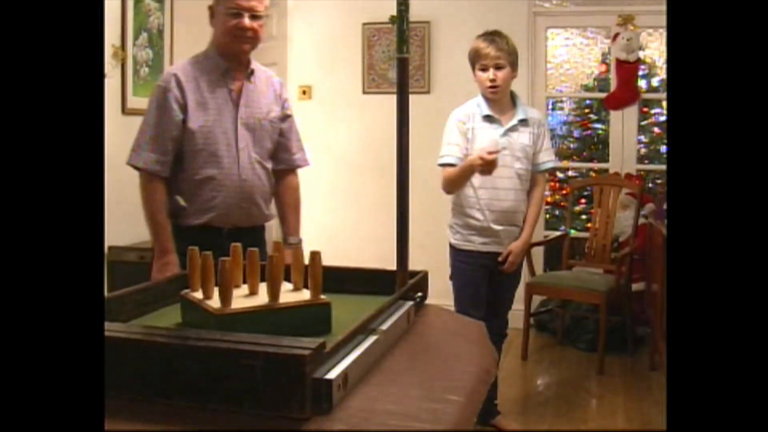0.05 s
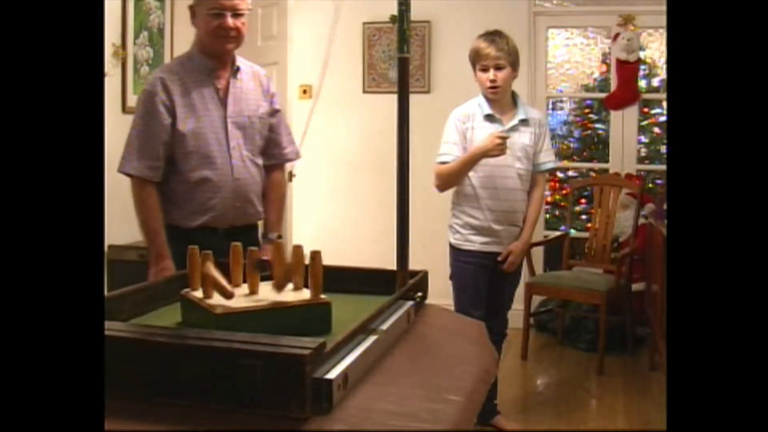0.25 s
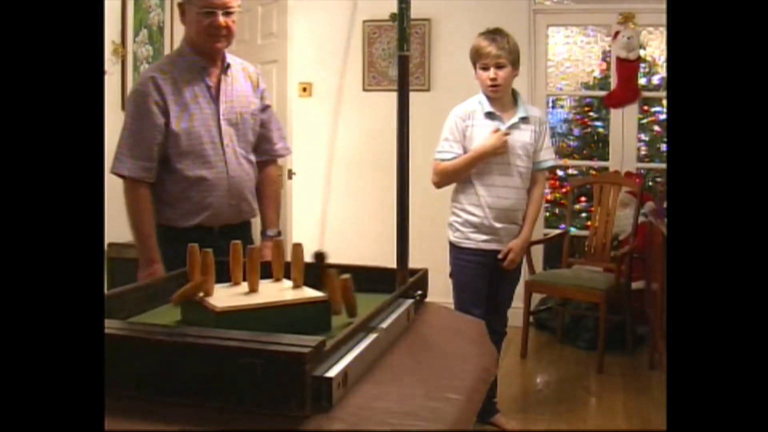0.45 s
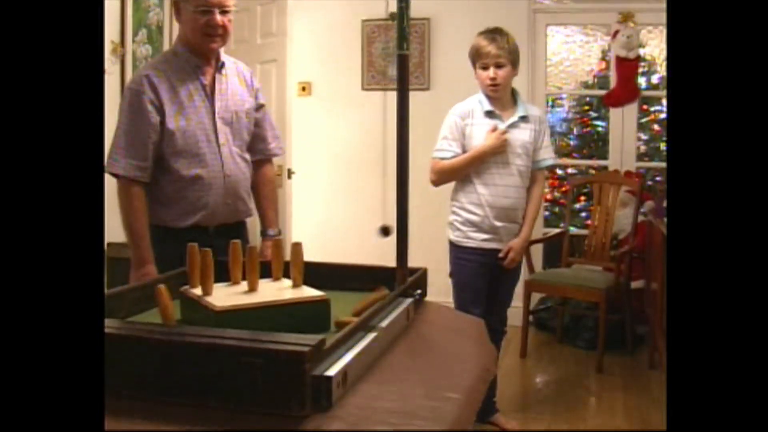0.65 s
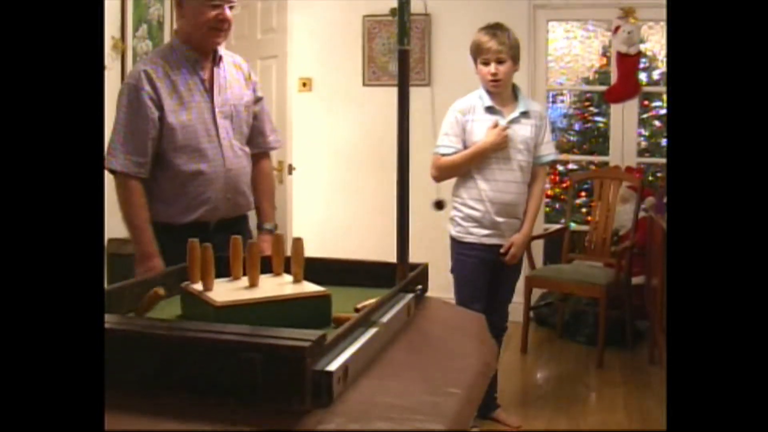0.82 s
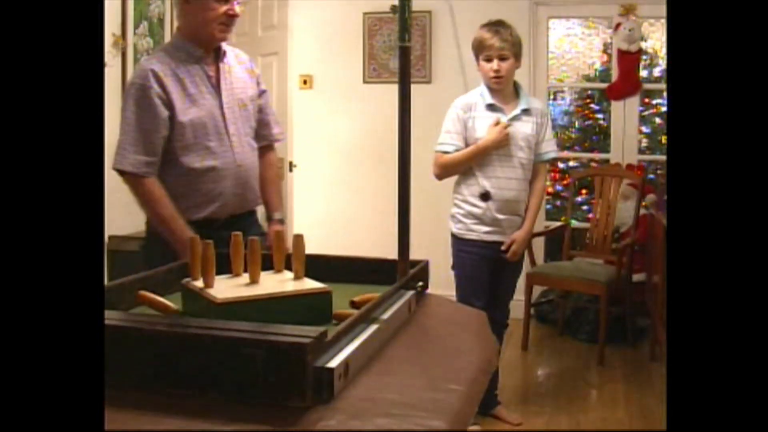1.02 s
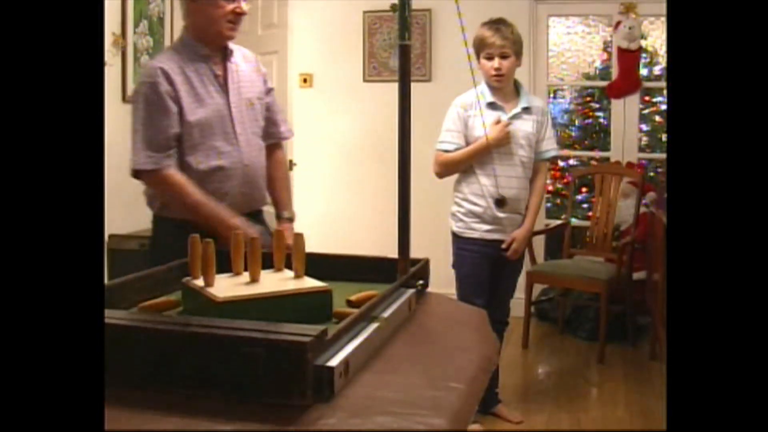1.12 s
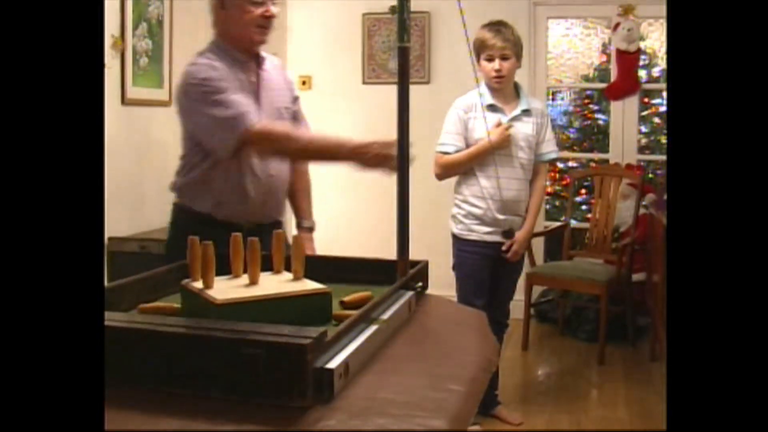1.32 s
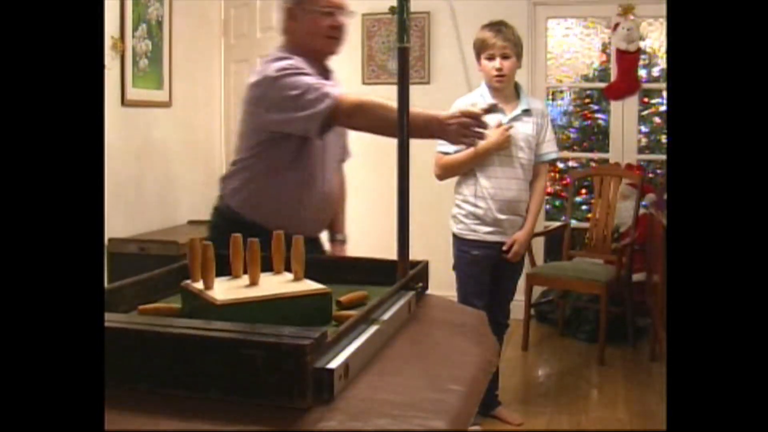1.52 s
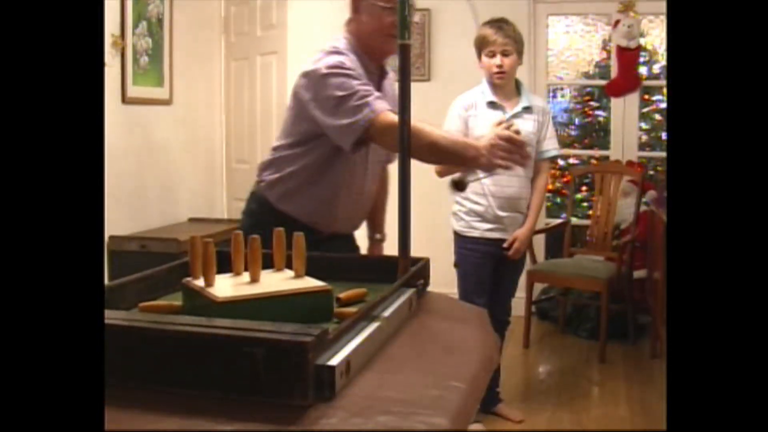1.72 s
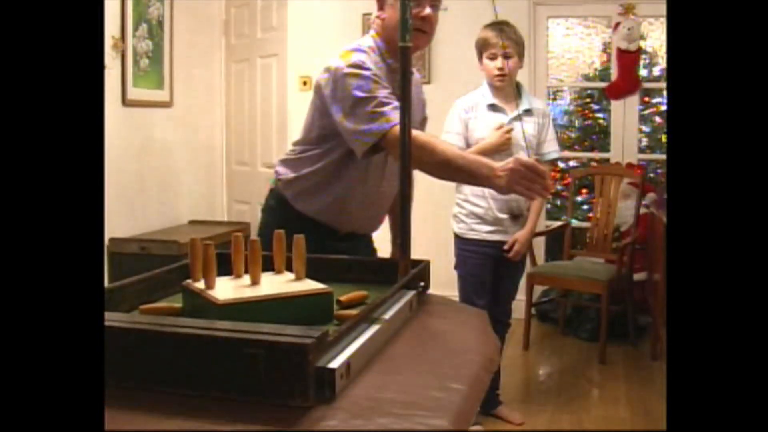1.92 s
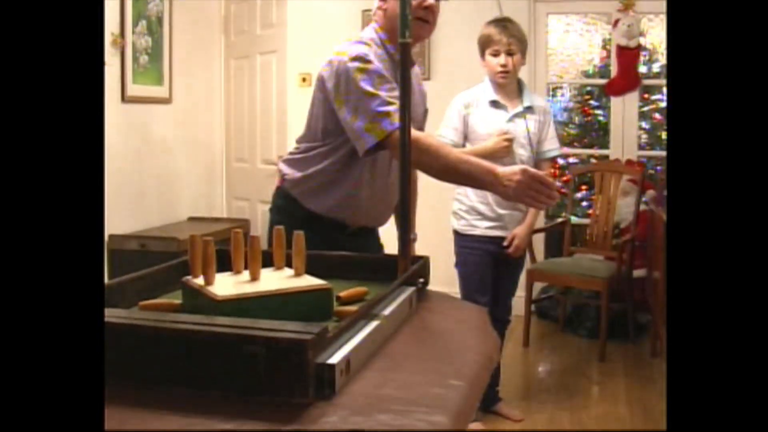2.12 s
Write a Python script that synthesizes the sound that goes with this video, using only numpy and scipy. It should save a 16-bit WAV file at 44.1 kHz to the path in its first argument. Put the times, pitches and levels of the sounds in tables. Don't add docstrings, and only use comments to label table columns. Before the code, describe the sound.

Hardwood cracks come first, then loud hollow knocks and rattling as skittles tumble into a wooden tray, quickly fading to soft rustling, cord creaks and light bumps, in a small live room on a modest microphone.

```python
import sys
import numpy as np
from scipy import signal
from scipy.fft import rfft, irfft
from scipy.io import wavfile

SR = 44100
rng = np.random.default_rng(int(sys.argv[2]) if len(sys.argv) > 2 else 0)


def dump(signal):
    limited = np.clip(np.atleast_2d(signal).T, -1, 1)
    pcm = np.round(limited * 32767).astype(np.int16)
    wavfile.write(sys.argv[1], SR, pcm)


def amplitude_ratio(level_db):
    exponent = np.asarray(level_db, float) / 20
    return 10 ** exponent


N = 95388
TIME_S = np.arange(N) / SR
LUCK_DB = 3

# pitch_hz [Hz], level_db [dB], t60_s [s to fall 60 dB]
TRAY_MODES = [(235, -9, 0.056), (278.8, -4.5, 0.065), (331, -4.5, 0.029), (355.2, 0.5, 0.056),
              (408, -2.5, 0.035), (429.6, -2.5, 0.048), (478, -2, 0.035), (546.5, -3, 0.044),
              (683, -4.5, 0.046), (778, -4, 0.026), (812, -5.5, 0.039), (1023, -7, 0.028),
              (1290, -12, 0.053), (1477, -18, 0.017)]


def rms_one(x):
    return x / np.sqrt(np.mean(x ** 2) + 1e-20)


def curve(rows):
    start_s, level_db = np.transpose(rows)
    return np.interp(TIME_S, start_s, level_db)


def at_hz(points, hz):
    points = np.array(points)
    return np.interp(np.log(hz), np.log(points[:, 0]), points[:, 1])


def colour(x, spectrum):
    size = 4096
    hz = np.arange(size // 2 + 1) * SR / size + 1
    cepstrum = irfft(at_hz(spectrum, hz) * np.log(10) / 20)
    cepstrum[1:size // 2] *= 2
    cepstrum[size // 2 + 1:] = 0
    response = irfft(np.exp(rfft(cepstrum)))[:size // 2]
    return signal.fftconvolve(x, response)[:len(x)]


def ring(clicks, hz, t60_s):
    decay = amplitude_ratio(-60 / (t60_s * SR))
    turn = 2 * np.pi * hz / SR
    return signal.lfilter([0, np.sin(turn)], [1, -2 * decay * np.cos(turn), decay ** 2], clicks + 1e-18)


def blows(rows, modes, spread_db):
    luck = rng.standard_normal((len(rows), len(modes)))
    out = np.zeros(N)
    for k, (hz, mode_db, t60_s) in enumerate(modes):
        clicks = np.zeros(N)
        for (start_s, peak_db, tilt_db, *spot_hz), z in zip(rows, luck):
            off_db = 0
            if spot_hz:
                off_db = min(15.5 * abs(np.log2(hz / spot_hz[0])), 10)
            bright_db = np.clip(tilt_db, -8, 4) * np.log2(hz / 400)
            clicks[int(start_s * SR)] += amplitude_ratio(peak_db + mode_db - off_db + spread_db * z[k] + bright_db)
        out += ring(clicks, hz, t60_s) * (-1) ** k
    return out


def plain_blows(rows, modes, spread_db):
    return blows([(start_s, peak_db, 0) for start_s, peak_db in rows], modes, spread_db)


def grains(per_s):
    sizes = amplitude_ratio(1.5 * np.minimum(rng.exponential(1, N), 4)) * rng.choice([-1, 1], N)
    return sizes * (rng.random(N) < per_s / SR)


def room(x):
    # pitch_hz [Hz], t60_s [s]
    decay_times = [(100, 1), (300, 0.45), (1000, 0.65), (3000, 0.55), (6000, 0.4), (12000, 0.2)]
    spots, spot_s, first_echo_s = 4, 0.05, 0.0037
    t = np.arange(SR) / SR
    edges_hz = 60 * 2 ** np.arange(0, 8, 0.5)
    white = rng.standard_normal((2, spots, SR))
    tail = 0
    for k, (low, high) in enumerate(zip(edges_hz, edges_hz[1:])):
        band_filter = signal.butter(2, [low, high], "band", fs=SR, output="sos")
        band = signal.sosfilt(band_filter, white[k % 2])
        tail = tail + band * amplitude_ratio(-60 * t / at_hz(decay_times, np.sqrt(low * high)))
    tail = tail * np.clip(t / first_echo_s - 0.5, 0, 1)
    tail = tail / np.sqrt(np.sum(tail ** 2, axis=1, keepdims=True))
    place = (TIME_S / spot_s - np.arange(spots)[:, None]) % spots
    share = np.sqrt(np.clip(1 - np.abs(place - 1), 0, 1))
    return signal.fftconvolve(x * share, tail, axes=1)[:, :N].sum(axis=0)


def air():
    # pitch_hz [Hz], level_db [dB per Hz]
    air_tone = [(60, -26), (110, -1), (350, 0), (600, -4.5), (1350, -10.5), (3000, -21), (7000, -12),
                (13000, -15.5)]
    return amplitude_ratio(-64) * rms_one(colour(rng.standard_normal(N), air_tone))


def cloth():
    # start_s [s], level_db [dB]
    movement = [(0, -62), (.3, -46.5), (.8, -59), (1.03, -69), (1.1, -63), (1.32, -59.5), (1.4, -54.5),
                (1.48, -54), (1.55, -64.5), (1.61, -56.5), (1.71, -61), (1.74, -69), (1.81, -72),
                (1.84, -55), (1.94, -56.5), (2.0, -64), (2.1, -66), (2.16, -63)]
    # pitch_hz [Hz], level_db [dB per Hz]
    cloth_tone = [(150, -15.5), (400, 4.5), (800, 2), (1300, -6.5), (2200, 1.5), (4000, -5.5), (7000, -5.5),
                  (13000, -10.5)]
    rub = rms_one(grains(per_s=2500)) + 0.5 * rng.standard_normal(N)
    return amplitude_ratio(curve(movement) - 1) * rms_one(colour(rub, cloth_tone))


def creak():
    # start_s [s], level_db [dB]
    strain = [
        (1.05, -76),
        (1.138, -61.5),
        (1.494, -61),
        (1.55, -72),
        (1.568, -63.5),
        (1.64, -59.5),
        (1.772, -76),
        (1.834, -60),
        (2.16, -69.5),
    ]
    # pitch_hz [Hz], level_db [dB], t60_s [s]
    cord_modes = [(1058, 3.5, 0.03), (1316, -0.5, 0.043), (1403, 1.5, 0.028), (1604, -3.5, 0.049)]
    slips = sum(amplitude_ratio(db) * ring(grains(per_s=450), hz, t60_s) for hz, db, t60_s in cord_modes)
    fade_in = np.clip((TIME_S - strain[0][0]) * 10 + 1, 0, 1)
    return amplitude_ratio(curve(strain) - 3) * fade_in * rms_one(slips)


def bumps():
    bump_times = [(1.324, -39, 4, 440), (1.334, -44.5, 6, 700), (1.347, -41, 6, 390),
                  (1.398, -43.5, 1, 453), (1.448, -51, 0, 536), (1.605, -50, 3, 347), (1.652, -44, 4, 372),
                  (1.821, -39.5, -0.5, 500), (1.837, -45.5, 5.5, 560), (1.852, -51, 3, 604),
                  (1.922, -55, 3, 480), (2.035, -47, -4, 245), (2.085, -46.5, 3, 510),
                  (2.105, -48.5, -4, 250)]
    return amplitude_ratio(-6.5) * blows(bump_times, TRAY_MODES, LUCK_DB)


def rolling():
    # start_s [s], level_db [dB]
    motion = [
        (0.29, -27),
        (0.358, -28),
        (0.406, -37),
        (0.462, -43),
        (0.556, -28),
        (0.7, -49),
        (1.05, -70.5),
        (1.2, -68),
    ]
    knocks = 0
    for hz, db, t60_s in TRAY_MODES:
        knocks = knocks + amplitude_ratio(db) * ring(grains(per_s=130), hz, t60_s) / (1 + (hz / 900) ** 2)
    fade_in = np.clip((TIME_S - motion[0][0]) * 100, 0, 1)
    fade_out = np.clip((motion[-1][0] - TIME_S) * 10 + 1, 0, 1)
    return amplitude_ratio(curve(motion) - 2.5) * fade_in * fade_out * rms_one(knocks)


def rocking():
    rock_times = [
        (0.047, -33.5),
        (0.056, -34),
        (.067, -31.5),
        (0.080, -36),
        (.093, -34.5),
        (0.133, -29),
        (0.158, -25.5),
        (0.174, -28.5),
        (.187, -28),
        (0.200, -28),
    ]
    # pitch_hz [Hz], level_db [dB], t60_s [s]
    plinth_modes = [(158.2, -8.5, 0.22), (235, -9.5, 0.085), (355, -1, 0.12), (511, -4, 0.099),
                    (668, -4.5, 0.05), (1060, -2.5, 0.061)]
    return amplitude_ratio(-2.5) * plain_blows(rock_times, plinth_modes, LUCK_DB)


def thuds():
    landings = [(0.2753, -1.5, 1.5, 372), (.281, -5, 3.5, 600), (.287, -2.5, -16.5, 354),
                (.296, -9.5, 3, 420), (.303, -10, -16, 310), (.318, -7.5, 4, 460), (.331, -20, 9, 404),
                (0.342, -13.5, -12, 460), (0.361, -10.5, -6, 453), (.373, -14.5, 2, 500),
                (.3875, -6, -1, 570), (0.3966, -3.5, 0.5, 355), (.403, -10.5, -9, 343),
                (.408, -8.5, 9, 900), (0.4138, -9.5, 4, 1000), (.421, -8, -12, 453),
                (.427, -7.5, -8.5, 403), (.449, -15.5, 5, 500), (.464, -20.5, 2.5, 686),
                (0.482, -20.5, 6, 450), (0.502, -14, 2.5, 390), (0.513, -23, 3, 397.4),
                (.531, -13.5, 2.5, 500), (.544, -15, -12, 426), (.557, -16, 8, 410.3), (.570, -18, -6, 420),
                (.584, -18, 4, 415), (.597, -17, 4, 354), (.612, -18, -2, 480), (.630, -25.5, 8, 557),
                (.652, -23, -1.5, 450), (.668, -23, 3, 437), (.690, -31, 4, 340), (.712, -23, -1, 353),
                (.733, -27.5, -3, 399.8), (0.757, -37, 0, 349)]
    # pitch_hz [Hz], level_db [dB], t60_s [s]
    frame_modes = [(134.3, -29, 1.2), (157.6, -21, 1.2), (169.6, -22.5, 1.28), (206, -24, 0.2)]
    frame = plain_blows([row[:2] for row in landings], frame_modes, LUCK_DB)
    return amplitude_ratio(-4) * blows(landings, TRAY_MODES, LUCK_DB) + amplitude_ratio(-19) * frame


def chatter():
    knocks = [(0.5299, -20.5), (0.5385, -18), (0.544, -17), (0.548, -22), (0.556, -24.5), (.578, -28),
              (0.627, -31), (0.6433, -28.5), (.672, -33.5), (0.699, -34), (0.789, -42.5)]
    # pitch_hz [Hz], level_db [dB], t60_s [s]
    ring_modes = [(1255, 2.5, 0.033), (1180, -14, 0.0076), (1270, -14, 0.0084)]
    ring_hz = ring_modes[0][0]
    in_step = [(np.round(start_s * ring_hz) / ring_hz, peak_db) for start_s, peak_db in knocks]
    return amplitude_ratio(-7.5) * plain_blows(in_step, ring_modes, spread_db=1)


def ticks():
    tick_times = [(.049, -25.5), (.0515, -25), (.062, -46), (.073, -43), (.0797, -24), (0.0834, -24),
                  (.0885, -26), (.102, -50), (.109, -42), (.117, -40), (.124, -41), (.133, -54),
                  (0.1604, -22), (0.175, -39)]
    # pitch_hz [Hz], level_db [dB], t60_s [s]
    ball_modes = [(3400, 0, 0.0033), (3970, 4.5, 0.0036), (4350, -1.5, 0.0065), (4660, 1, 0.0063),
                  (5300, 5, 0.0037), (5690, 2.5, 0.0038), (6300, -11.5, 0.0048), (8920, 0.5, .008),
                  (11700, -16, 0.0038)]
    return amplitude_ratio(-2.5) * plain_blows(tick_times, ball_modes, LUCK_DB)


def clacks():
    hits = [(0.0468, -54, -14, 15), (0.0457, -17.5, -15, 1), (0.0798, -28.5, -20, -29),
            (0.084, -28.5, -18, -13), (0.0887, -22, -26, -1), (0.092, -30.5, -38, 10),
            (0.1301, -23.5, -22, 6.5), (0.1552, -26.5, -14, 17.5), (0.159, -23.5, -6.5, 12),
            (0.1727, -26.5, -6, 14), (0.179, -52, -33, 9), (0.2046, -42.5, 4, 9), (0.2762, -37.5, 0.5, 22),
            (0.4039, -44, -33, 20.5), (0.4097, -32.5, -13, 19), (0.5322, -56, -3, 9),
            (0.5327, -40.5, -7.5, 16.5), (0.5462, -49, -32, 20), (1.83, -54.5, -28, -21)]
    # pitch_hz [Hz], level_db [dB], t60_s [s]
    skittle_modes = [(1040, -5, .02), (1200, -6, .015), (1370, -3, .022), (1480, -4, .02), (1560, -3, .022),
                     (1750, -4, .018), (1900, -5, .015), (2130, -5, .015), (2260, -6, .015),
                     (2480, -8, .012)]
    # pitch_hz [Hz], level_db [dB per Hz]
    crack_tone = [(300, -41), (700, -1.5), (1500, -3), (3000, 1.5), (5000, -3.5), (6500, -7.5)]
    low_s, top_s, split_hz = 0.006, 0.0048, 7700
    length = 1500
    t = np.arange(length) / SR
    low, top = np.zeros(N + length), np.zeros(N + length)
    noise = np.sign(rng.standard_normal((len(hits), length)))
    noise[:, 0] = 2.1
    for (start_s, peak_db, top_db, _), z in zip(hits, noise):
        i = int(start_s * SR)
        low[i:i + length] += amplitude_ratio(peak_db) * z * np.exp(-t / low_s)
        top[i:i + length] += amplitude_ratio(peak_db + top_db + 7) * z * np.exp(-t / top_s)
    low_pass = signal.butter(4, split_hz, fs=SR, output="sos")
    top_band = signal.butter(8, [split_hz, 12300], "band", fs=SR, output="sos")
    crack = signal.sosfilt(low_pass, colour(low[:N], crack_tone)) + signal.sosfilt(top_band, top[:N])
    body_hits = [(start_s, peak_db + body_db) for start_s, peak_db, _, body_db in hits]
    body = plain_blows(body_hits, skittle_modes, LUCK_DB / 2)
    return amplitude_ratio(1) * crack + amplitude_ratio(-9.5) * body


def scene():
    sharp = clacks() + ticks()
    dull = thuds() + bumps() + rocking() + rolling()
    rings = chatter()
    echoes = room(amplitude_ratio(-2.5) * sharp + amplitude_ratio(-9.5) * dull + amplitude_ratio(-12.5) * rings)
    knocks = amplitude_ratio(2) * (sharp + dull + rings + echoes)
    return (knocks + cloth() + creak() + air())[None]


def gain_control(x):
    limit_db, squeeze, attack_s = -30, 0.34, 0.00028
    ramp_db = 86 * TIME_S
    level_db = 20 * np.log10(np.abs(x[0]) + 1e-9)
    held_db = np.maximum.accumulate(level_db + ramp_db) - ramp_db
    r = np.exp(-1 / (attack_s * SR))
    cut_db = signal.lfilter([1 - r], [1, -r], squeeze * np.maximum(held_db - limit_db, 0))
    return x * amplitude_ratio(-cut_db)


def band_limit(x):
    return signal.sosfilt(signal.butter(12, 13390, fs=SR, output="sos"), x)


def record(dry):
    # pitch_hz [Hz], level_db [dB]
    mic_tone = [(2000, 0), (3700, -2), (5100, 2.5), (6000, -1.5), (7400, -9), (9000, -5.5), (10300, -5),
                (11800, -4.5)]
    bass_cut = signal.butter(4, 163.5, "high", fs=SR, output="sos")
    x = signal.sosfilt(bass_cut, colour(dry[0], mic_tone)[None])
    x = gain_control(x)
    ceiling, lopsided = 0.26, 0.4
    x = ceiling * np.tanh((x + lopsided * x ** 2) / ceiling)
    top_cut = signal.cheby2(12, 30, 13500, fs=SR, output="sos")
    x = signal.sosfilt(top_cut, x)
    rumble = amplitude_ratio(-76.5) * rms_one(signal.lfilter([1], [1, -0.995], rng.standard_normal(N)))
    offset = 0.0045
    return band_limit(x + rumble + offset)


dry = scene()
out = record(dry)
dump(out)
```